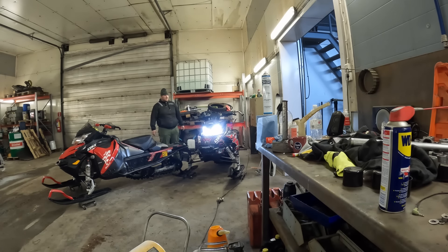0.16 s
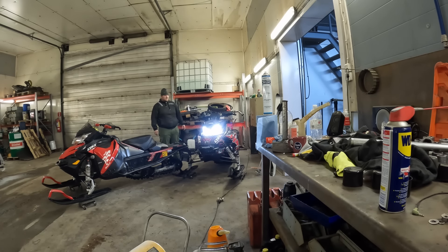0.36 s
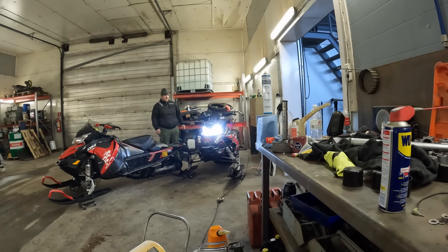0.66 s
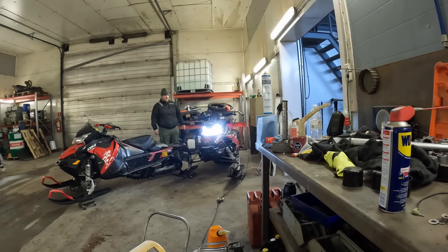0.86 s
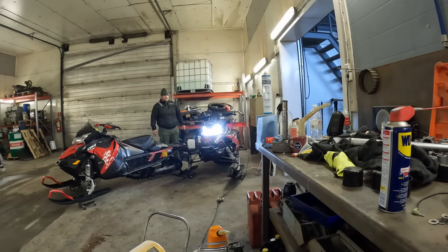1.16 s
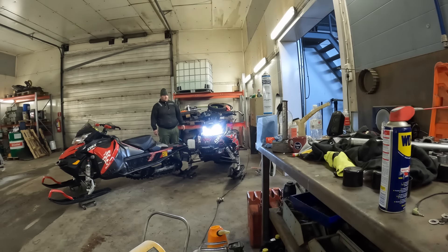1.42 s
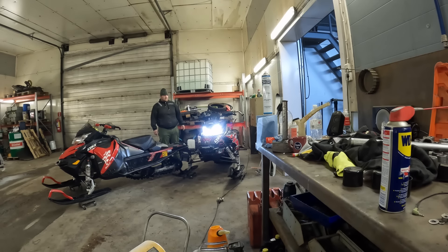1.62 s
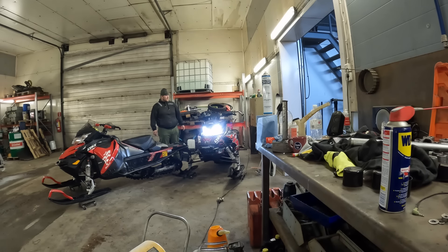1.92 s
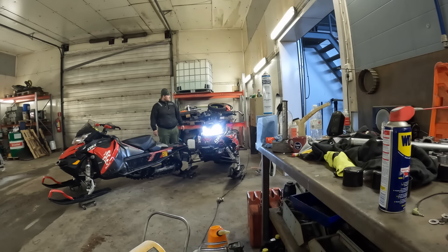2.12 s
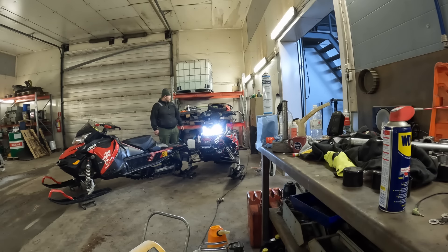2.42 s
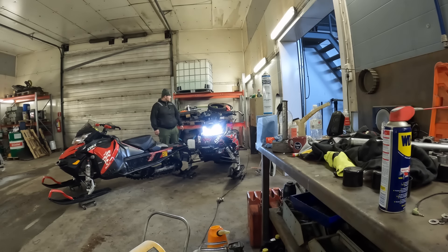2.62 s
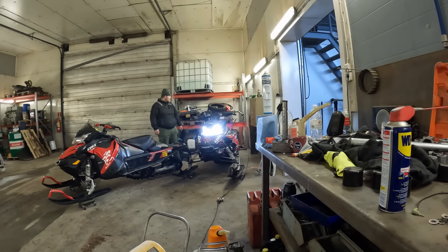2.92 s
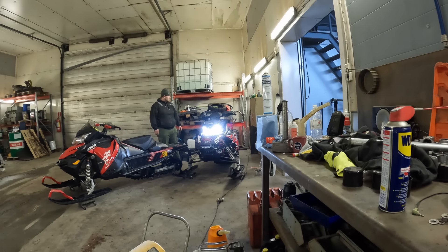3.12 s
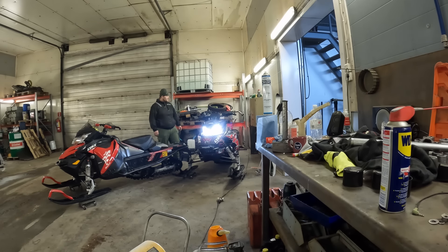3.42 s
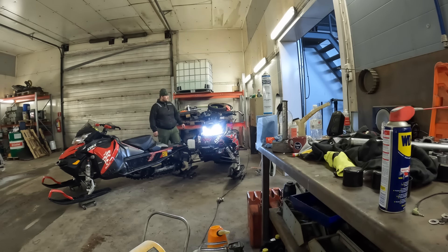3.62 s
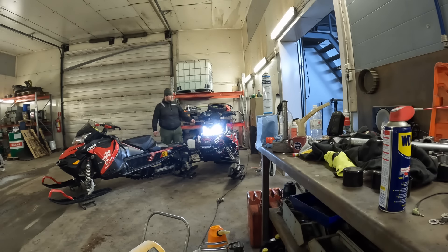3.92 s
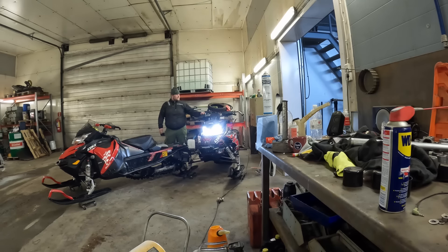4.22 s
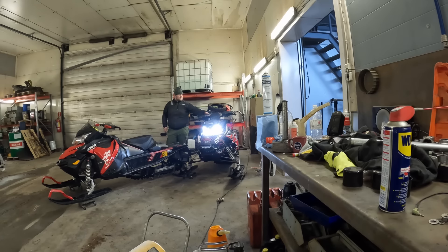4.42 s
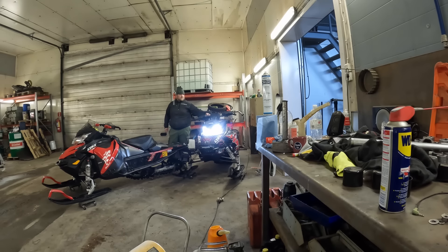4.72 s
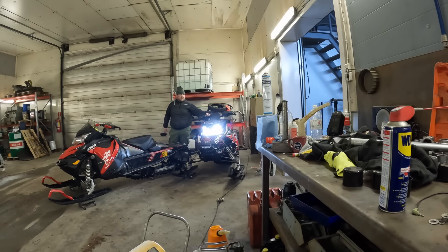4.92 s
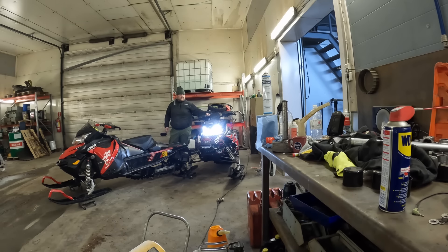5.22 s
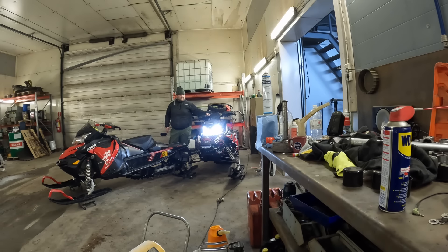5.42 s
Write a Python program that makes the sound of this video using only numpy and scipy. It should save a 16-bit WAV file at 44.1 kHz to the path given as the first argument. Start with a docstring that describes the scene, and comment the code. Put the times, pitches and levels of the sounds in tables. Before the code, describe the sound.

A two-stroke twin-cylinder snowmobile idles throughout, about 5.5 seconds, in a hard-walled garage. Roughly fifty exhaust puffs a second fuse into a rough low growl, alternately stronger and weaker, ringing in dark exhaust and room resonances. A deep boom swells from about 0.3 s and stays full until 1.2 s, while the idle runs slightly high. From 1.5 s it sags and hunts, with tiny stumbles where the bass drops for an instant, strongest near 2.1, 2.3, 2.9 and 3.2 s. Pitch and boom recover around 3.9 to 4.1 s, then turn uneven again, with dips near 4.5, 4.9 and 5.4 s. Wavering buzzy pipe tones flicker in short bursts. Steady broad intake, belt and fan whir pulses lightly with the firing, over faint smeared ticks. A small stereo camera a few metres away hears close, bright reflections, softened peaks and gently levelled loudness. The engine never shuts off.

```python
"""A rough engine idle hunts and growls, with a deep boom, broad whir and faint ticks, in a hard-walled garage.
A two-stroke twin snowmobile stands a few metres from a small camera on a bench: uneven firing puffs ring the
exhaust and room resonances, sines at multiples of the firing rate sing in the pipe and one at the rate booms.
Intake, belt and fan noise breathes with the cycle; the camera's gain falls as the running power rises."""
import sys
import numpy as np
from scipy import signal
from scipy.fft import rfft, irfft
from scipy.io import wavfile
from scipy.ndimage import uniform_filter1d

SR = 44100
rng = np.random.default_rng(int(sys.argv[2]) if len(sys.argv) > 2 else 0)


def generate_wav(signal):
    """Clip the signal to [-1, 1] and save it as 16-bit WAV at the path in sys.argv[1]."""
    frames = np.transpose(np.atleast_2d(signal))
    scaled = np.clip(frames, -1, 1) * 32767
    pcm = np.round(scaled).astype(np.int16)
    wavfile.write(sys.argv[1], SR, pcm)


N = 245195
HZ = np.fft.rfftfreq(N, 1 / SR)
TIME_S = np.arange(N) / SR
STEADY_HZ = 49.7  # reference firing rate

# relative spectrum of intake, belt and fan noise: (frequency [Hz], density [dB per Hz])
WHIR_SPECTRUM = [(200, 2.5), (450, -2.5), (616, -7), (814, -8.5), (893, -4), (1040, -0.5), (1280, -5.5),
                 (1450, -4), (1900, -8.5), (2000, -9.5), (2180, -9.5), (2350, -13.5), (2700, -14),
                 (3600, -16.5), (4590, -21.5), (5040, -21), (7350, -30.5), (7600, -41.5), (9000, -40.5),
                 (11000, -46), (13500, -56.5)]


def undb(db):
    """Amplitude gain of a level in dB."""
    return 10 ** (np.asarray(db) / 20)


def level(x, db):
    """Scale to an rms level in dB."""
    return x * undb(db) / np.sqrt(np.mean(x ** 2))


def along(table):
    """Read a (frequency, value) table at every FFT bin, on a log frequency axis."""
    f, v = np.transpose(table)
    return np.interp(np.log(HZ + 1), np.log(f + 1), v)


def over_time(table):
    """Read the value columns of a (time, value, ..) table at every sample."""
    s, *columns = np.transpose(table)
    return [np.interp(TIME_S, s, c) for c in columns]


def ring(x, modes):
    """Sum of two-pole resonances (frequency, width, dB) of alternating sign."""
    response = 0
    for k, (f, width, db) in enumerate(modes):
        damping = 1j * HZ * width
        response = response + (-1) ** k * undb(db) * damping / (f * f - HZ ** 2 + damping)
    return irfft(rfft(x) * response, N)


def walk(rate_hz):
    """Random levels held 1 / rate_hz seconds, then smoothed twice; spread near 1."""
    hold = int(SR / rate_hz)
    steps = np.repeat(rng.standard_normal(N // hold + 1), hold)[:N]
    return 1.3 * uniform_filter1d(uniform_filter1d(steps, hold), hold)


def echo(x, t60_s):
    """Dense reflections from concrete and sheet metal: decaying noise of unit energy."""
    t = np.arange(SR) / SR
    tail = rng.standard_normal(SR) * np.exp(-np.log(1000) * t / t60_s)
    return signal.fftconvolve(x, level(tail, 0) / np.sqrt(SR))[:N]


def stumble_db():
    """Bell-shaped drops in level, as a weak firing lets the boom and pipe notes fall away."""
    # stumbles: (time [s], depth [dB])
    stumbles = [(1.57, 3), (1.75, 7), (1.89, 8), (2.07, 17), (2.329, 21), (2.78, 8), (2.92, 14),
                (3.13, 6.5), (3.24, 21), (3.59, 3.5), (3.72, 12), (4.47, 15), (4.61, 11), (4.79, 5),
                (4.89, 18), (5.42, 17)]
    sigma_s = 0.013
    return -sum(db * np.exp(-.5 * ((TIME_S - s) / sigma_s) ** 2) for s, db in stumbles)


def rattle(turns):
    """Piston slap and loose parts: noisy ticks near fixed places in each firing cycle, smeared by the walls."""
    # knocks: place in the firing cycle [turns]
    places = [0.11, 0.47, .62]
    decay_s, jitter_s, scatter_db = 0.0068, .002, 5  # jitter and scatter are +/-
    hits = np.zeros(N)
    for place in places:
        at = np.flatnonzero(np.diff(np.floor(turns - place)))
        chance = 2 * rng.random((len(at), 2)) - 1
        hit_at = np.clip(at + jitter_s * SR * chance[:, 0], 0, N - 1).astype(int)
        hits[hit_at] = undb(scatter_db * chance[:, 1])
    envelope = signal.lfilter([1], [1, -np.exp(-1 / (decay_s * SR))], hits)
    ticks = envelope * rng.standard_normal(N)
    smeared = ticks + undb(-6.5) * echo(ticks, t60_s=0.25)
    shape = undb(along(WHIR_SPECTRUM)) * HZ ** 2 / (HZ ** 2 + 1380.0 ** 2)  # less bass than the whir
    return level(irfft(rfft(smeared) * shape, N), -40.5)


def whir(turns, hz):
    """Intake, belt and fan noise plus casing ring: lows swell by crank turn, highs by firing."""
    # ringing of the engine casing: (frequency [Hz], width [Hz], level [dB])
    casing = [(910, 25.5, 14), (1042, 30, 6.5), (1420, 40, 5), (1870, 18, 15), (2410, 27, 3.5),
              (3515, 30, -2), (3680, 39, -3.5)]
    brighten_db_per_hz = 0.06  # treble rises as the firing rate sags
    noise = rng.standard_normal((2, N))
    broad = irfft(rfft(noise[0]) * undb(along(WHIR_SPECTRUM)), N)
    body = level(broad, -30.0) + level(ring(noise[1], casing), -42.0)
    body = body + undb(-14.0) * echo(body, t60_s=.3)
    low = signal.sosfilt(signal.butter(2, 2300, fs=SR, output="sos"), body)
    high = body - low
    # two firings per crank turn
    by_turn_db = (1.3 + .3 * walk(12)) * np.cos(np.pi * turns) + .5 * walk(6.8)
    by_firing_db = (.7 + .25 * walk(15)) * np.cos(2 * np.pi * (turns - .45)) + .43 * walk(8)
    treble_db = brighten_db_per_hz * (STEADY_HZ - hz)
    return low * undb(by_turn_db) + high * undb(by_firing_db + treble_db)


def boom(turns, boom_db, drop_db):
    """Lowest standing wave of the room: a sine at the firing rate over a narrow rumble."""
    rumble = ring(rng.standard_normal(N), [(21, 17.0, -17.0), (58.0, 6.8, -6)])
    tone = np.sqrt(2) * undb(boom_db + drop_db) * np.sin(2 * np.pi * turns)
    return tone + level(rumble, -33) * undb(drop_db / 2)


def pipe(turns, hz, notes_db, drop_db):
    """Exhaust sings multiples of the firing rate; each breaks into short bursts and wanders in phase."""
    # notes: (multiple of firing rate [1], dip depth [dB], dip rate [1/s], share of a stumble [0-1],
    #         phase wander [rad])
    notes = [(3, 4, 16, 0.65, 0.15), (2.5, 7, 24, 0.3, 0.7), (4, 6, 24, 0.3, 0.6), (5, 7, 28, 0.4, 0.72),
             (7, 7, 30, 0.3, 0.8), (10, 5, 24, 0, 0.75)]
    unsteady_per_hz = 0.2  # dips and wander grow as the firing rate sags
    start_rad = 2 * np.pi * rng.random(len(notes))
    unsteady = np.clip(1 + unsteady_per_hz * (STEADY_HZ - hz), .8, 1.4)
    out = 0
    for k, (multiple, dip_db, dips_per_s, share, wander_rad) in enumerate(notes):
        burst_db = unsteady * dip_db * (.5 - np.abs(walk(dips_per_s)))
        gain = undb(notes_db[k] + burst_db + share * drop_db)
        phase_rad = 2 * np.pi * multiple * turns + start_rad[k] + unsteady * wander_rad * walk(26)
        out = out + gain * np.sin(phase_rad)
    return out


def exhaust(turns, hz, low_db, upper_db):
    """One puff per firing; timing and strength scatter more as the idle sags and the charge burns badly."""
    # exhaust and room resonances: (frequency [Hz], width [Hz], level [dB])
    modes = [(78.2, 18, 7), (86.1, 13, 4), (113, 13.5, -9.5), (125, 26, 2.5), (155.8, 9, -8.5),
             (173.4, 23, -4.5), (193, 13.7, -7.5), (222.5, 21, -4), (258.7, 17.5, -3), (276.9, 20.3, -1),
             (309.7, 16.6, -4), (343, 16.7, -3.5), (356, 27.5, -8), (380, 21.5, -7.5), (404.4, 23.3, -8),
             (430.2, 14, -11), (467.5, 18.7, -13.5), (542, 53, -20.5)]
    low_puffs_hz = 230
    at = np.flatnonzero(np.diff(np.floor(turns)))
    chance = rng.standard_normal((len(at), 2 + len(modes)))
    sag = np.clip(1 + 0.099 * (51 - hz[at]), .3, 2)
    twin_db = 2.05 * (-1) ** np.arange(len(at))  # one cylinder fires harder
    late = 0.0006 * SR * sag * chance[:, 0]  # samples, either sign
    strength = undb(twin_db + 2.6 * sag * np.tanh(chance[:, 1]))
    out = 0
    for k, mode in enumerate(modes):
        # own path round the room: own delay, own share of every puff
        path = rng.random() * SR / 25
        pulses = np.zeros(N)
        pulse_at = np.clip(at + late + path, 0, N - 1).astype(int)
        pulses[pulse_at] = strength + 0.54 * sag * chance[:, 2 + k]
        rung = ring(ring(pulses, [mode]), [(*mode[:2], 0)])  # twice: dark valleys between
        out = out + undb(low_db if mode[0] < low_puffs_hz else upper_db) * rung
    puff = signal.butter(3, 650, fs=SR, output="sos")  # a puff of gas has no sharp edge
    return level(signal.sosfilt(puff, out), -24.5)


def scene():
    """Engine heard straight and by way of the walls at two close ports."""
    # hunting idle: (time [s], firing rate [Hz], boom [dB], pipe note at multiple 3 [dB])
    idle = [(0.0, 51.67, -22, -33), (0.14, 51.49, -19.5, -24), (0.3, 52.91, -15.5, -28.5),
            (0.54, 52.54, -13, -26.5), (1.05, 52.77, -13, -23.5), (1.35, 50.82, -18.5, -24),
            (1.52, 50.78, -18.5, -25.5), (1.66, 50.16, -28, -28.5), (1.95, 49.22, -21.5, -23.5),
            (2.25, 48.84, -21.5, -36), (2.42, 50.14, -19, -25.5), (2.68, 51.06, -21, -24),
            (2.9, 49.31, -22.5, -28), (3.25, 48.35, -22.5, -27), (3.45, 50.2, -22, -24),
            (3.68, 48.58, -18.5, -28), (3.86, 51.91, -15.5, -26), (4.08, 51.82, -15, -22),
            (4.3, 50.43, -22, -28.5), (4.55, 49.94, -22.5, -31), (4.72, 50.13, -22.5, -25.5),
            (4.85, 49.33, -28, -35), (5.08, 49.96, -23, -20.5), (5.3, 50.66, -18.5, -26.5),
            (5.56, 51.28, -24, -24)]
    # shifting growl: (time [s], multiple 2.5 [dB], fourth [dB], fifth [dB], seventh [dB],
    #                  low puffs [dB], upper puffs [dB])
    growl = [(0, -16, -29, -22.5, -39, -6, 0), (.2, -35.5, -34, -31, -28.5, 3, -2),
             (.4, -32, -38, -26, -26, 2.5, -2), (.7, -31, -45.5, -25.5, -33.5, -7, 4.5),
             (.95, -33, -32, -28, -26, 2.5, -1.5), (1.2, -31.5, -37, -25.5, -28.5, -3.5, 2),
             (1.4, -30, -42, -33, -28, 2.5, 2), (1.65, -41, -33, -27, -32, 2, -0.5),
             (1.9, -23.5, -33, -34, -27, -2, 2), (2.15, -27, -31, -28, -31.5, 0.5, 4.5),
             (2.35, -33, -36, -35, -30, 4, 0), (2.5, -31, -31, -27, -27.5, -2.5, -1),
             (2.7, -35, -33, -24, -31.5, -2.5, 1), (2.9, -17, -25.5, -34, -28, 3.5, 3),
             (3.05, -33, -37, -37, -23, 0.5, -1), (3.28, -25, -28, -29, -32, 2.5, -1),
             (3.45, -34, -31, -31.5, -29.5, -7, -0.5), (3.7, -25, -30, -30, -31, -1.5, 2.5),
             (3.95, -25, -35, -26.5, -31.5, -5.5, -0.5), (4.25, -31, -33, -26, -26.5, -2.5, -1),
             (4.5, -25, -35, -32.5, -27, 3, 0.5), (4.7, -32, -26, -45, -29, -2.5, 1.5),
             (4.85, -24, -29, -21.5, -24.5, 0.5, 3.5), (5.0, -36, -29, -31, -26, -1.5, -1.5),
             (5.18, -23, -38, -33.5, -37, -7, 0.5), (5.35, -40, -37, -26.5, -31, 4.5, -0.5),
             (5.56, -23, -34, -28.5, -29, -1.5, 1.5)]
    # reflected sound, opposite in the two ports, re direct: (frequency [Hz], level [dB])
    diffuse = [(60, -52), (170, -55), (290, -15.5), (490, -13), (830, -11), (1400, -10.5), (2370, -8.5),
               (4000, -8.5), (6770, -7.5), (9000, 2.5), (13000, -9)]
    # phase by which left leads right: (frequency [Hz], lead [rad])
    port_lead = [(60, -.02), (300, -.12), (780, -.24), (2930, -.55), (5770, 0)]
    # left minus right: (frequency [Hz], level difference [dB])
    port_tilt = [(60, .1), (250, .9), (1000, 1.4), (4000, .5), (12000, 1.2)]
    hz, boom_db, third_db = over_time(idle)
    *middle_db, low_db, upper_db = over_time(growl)
    tenth_db = -47.5 + 2.5 * (hz - STEADY_HZ)  # shows faintly when the idle runs high
    notes_db = [third_db, *middle_db, tenth_db]
    turns = np.cumsum(hz) / SR  # firing cycles
    drop_db = stumble_db()
    mid = exhaust(turns, hz, low_db, upper_db) + pipe(turns, hz, notes_db, drop_db)
    mid = mid + whir(turns, hz) + rattle(turns) + boom(turns, boom_db, drop_db)
    side = rfft(echo(mid, t60_s=0.57)) * undb(along(diffuse))
    port = undb(along(port_tilt) / 2) * np.exp(.5j * along(port_lead))
    direct = rfft(mid)
    return np.array([irfft(direct * port + side, N), irfft(direct / port - side, N)])


def record(dry):
    """Slow gain control from the running power, soft peaks, steep top cut."""
    average_s, top_hz = .3, 14300
    step = 1 / (average_s * SR)
    power = signal.lfilter([step], [1, step - 1], np.mean(dry ** 2, axis=0), zi=[.028])[0]
    wet = dry * (undb(-31.5) / power) ** 0.27
    soft = np.tanh(1.169 * wet) / 1.137
    return signal.sosfilt(signal.ellip(8, .2, 70, top_hz, fs=SR, output="sos"), soft)


dry = scene()
out = record(dry)
generate_wav(out)
```